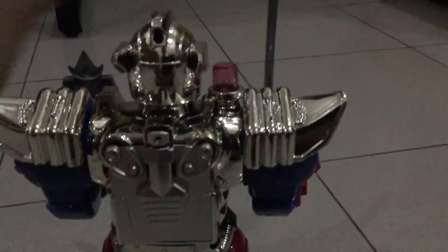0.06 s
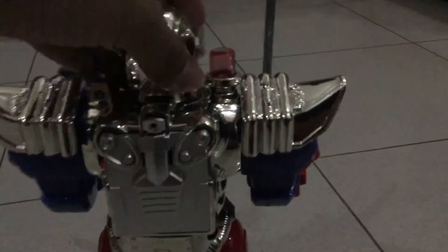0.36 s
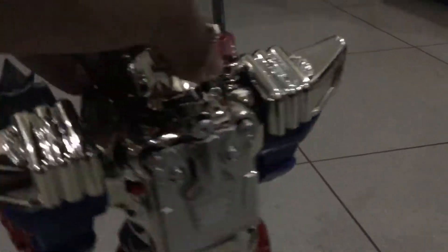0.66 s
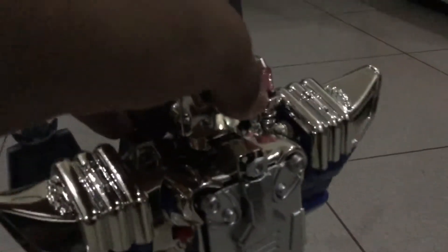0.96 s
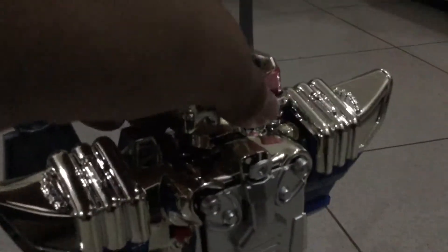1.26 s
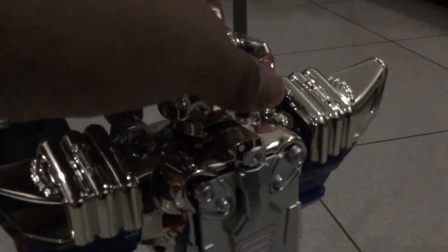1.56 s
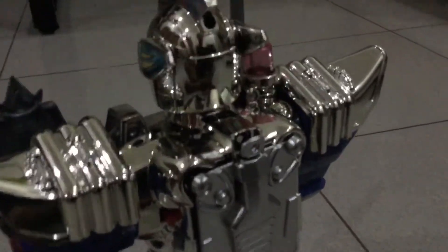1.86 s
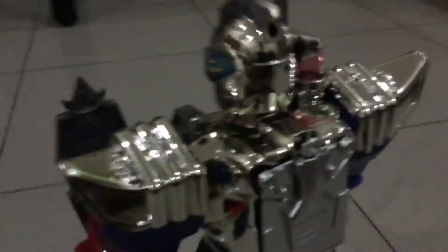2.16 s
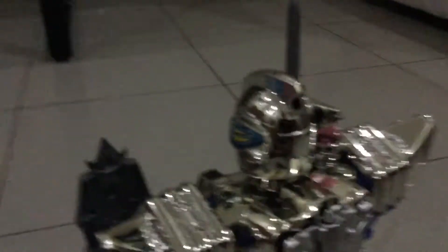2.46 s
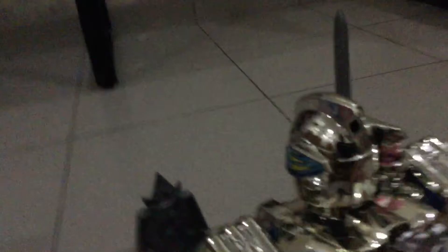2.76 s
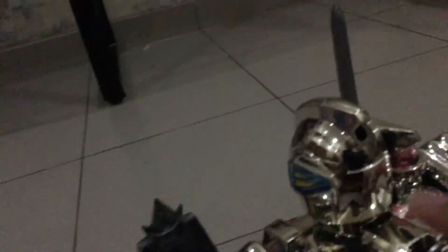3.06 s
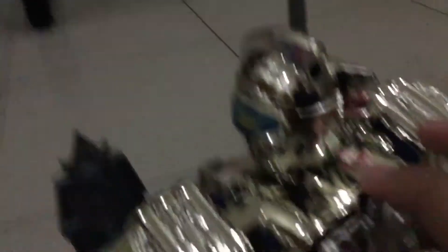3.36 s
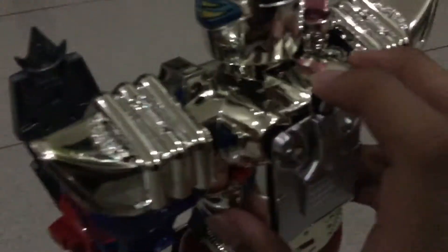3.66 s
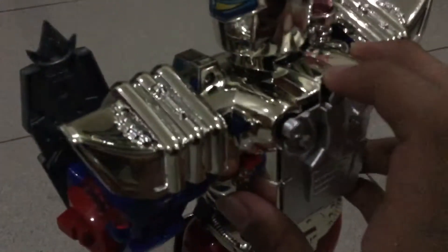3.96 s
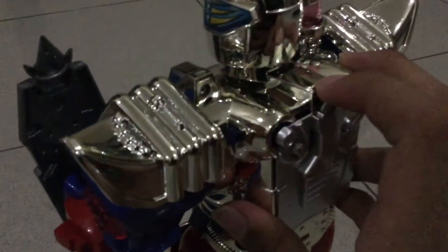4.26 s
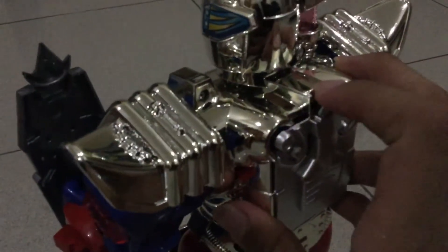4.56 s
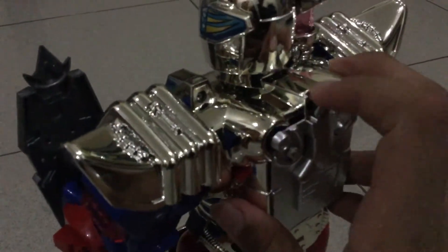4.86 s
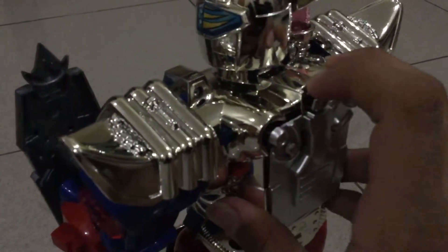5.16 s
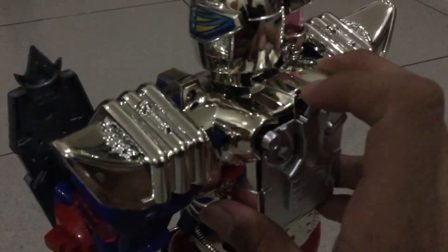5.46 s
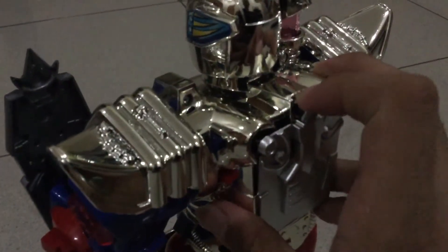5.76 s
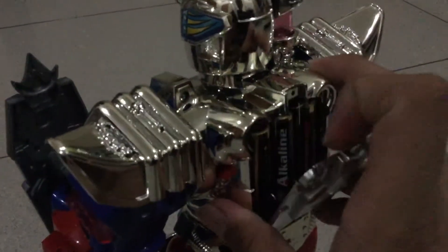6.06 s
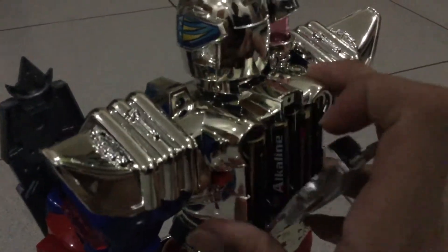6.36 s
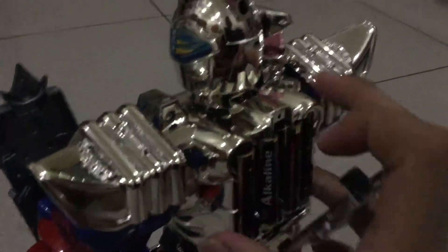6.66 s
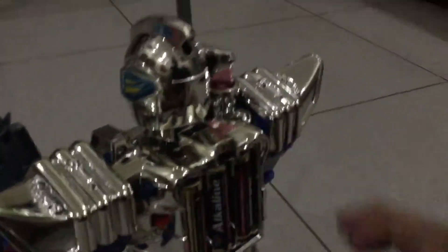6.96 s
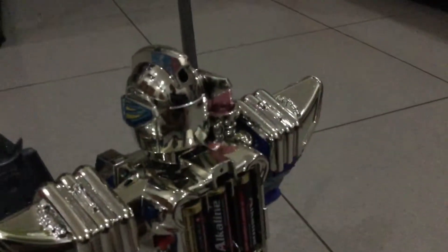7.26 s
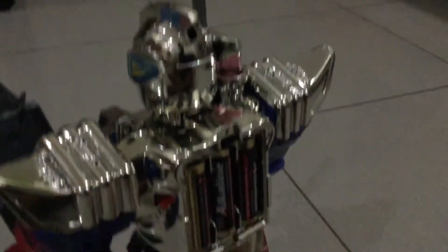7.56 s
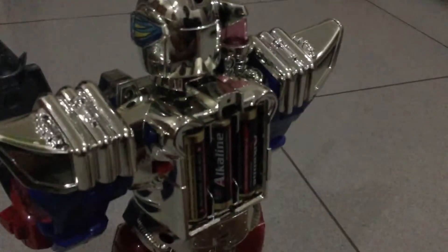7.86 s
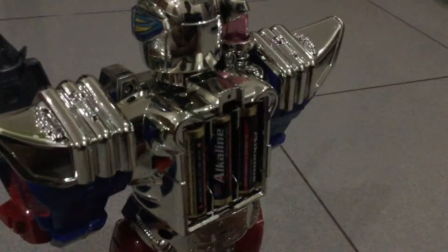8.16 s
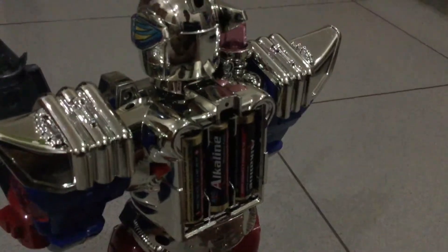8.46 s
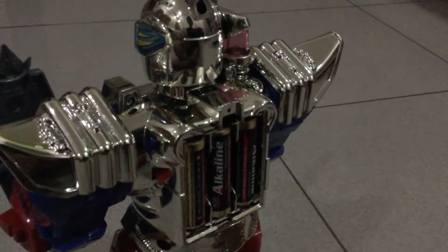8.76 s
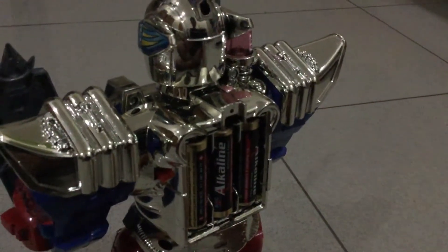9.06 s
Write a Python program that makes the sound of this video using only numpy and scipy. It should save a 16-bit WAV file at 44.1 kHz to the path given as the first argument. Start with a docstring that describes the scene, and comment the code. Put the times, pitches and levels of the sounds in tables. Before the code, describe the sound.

In a quiet tiled room, a cricket chirps faintly and steadily over a low rumble and soft hiss. Close by, a plastic toy's head clicks and grinds as it is twisted, followed by a brief rub and bumps on the microphone. A fingernail picks at the battery cover with sharp clicks until it snaps off, the loudest sound. A few soft handling taps trail away.

```python
"""A low room rumble, faint hiss and far insects come first, with a cricket chirping by rubbing its wings.
A hand turns the head of a hollow plastic toy robot, which clicks and grinds. Each click is a short run
of slips that makes the plastic ring, and a tiled room answers. Fingers shift their grip on a camera
once, with a rub and a few bumps. Then a nail pries at the toy's battery cover until it snaps off."""
import sys
import numpy as np
from scipy import signal
from scipy.fft import rfft, irfft
from scipy.io import wavfile
from scipy.ndimage import uniform_filter1d

SR = 44100
rng = np.random.default_rng(int(sys.argv[2]) if len(sys.argv) > 2 else 0)


def to_wav(s):
    """Save 16-bit WAV."""
    ch = np.atleast_2d(s).T  # columns
    pcm = np.round(np.clip(ch, -1, 1) * 32767)  # PCM
    wavfile.write(sys.argv[1], SR, pcm.astype(np.int16))


N = 410571

# tone of the room's rumble, a soft drone in it, the hiss and the far insects: f/Hz, level/dB
RUMBLE = [(20, -53.5), (30, -30), (40, -14), (62, 2), (100, -2.5), (140, -3.5), (200, -3.5), (260, -9.5),
          (350, -17.5), (500, -31), (1000, -53.5)]
DRONE = [(60, -42.5), (110, -17), (135, -5), (149, 3), (168, -6.5), (200, -8), (250, -19.5), (450, -47.5)]
HISS = [(300, 2.5), (500, -0.5), (900, -2), (1500, -3), (3000, -6.5), (5000, -5), (6500, -9), (8600, -7.5),
        (10000, -23), (12500, -16), (15000, -28.5), (16000, -31.5)]
FAR_INSECTS = [(6000, -38), (6700, -18), (6980, -4), (7150, -3.5), (7450, -3), (7650, -1), (7850, -5),
               (8050, -0.5), (8300, -16), (9000, -35.5)]
# moments when the drone grows louder: t/s, half width/s, lift/dB
DRONE_SWELLS = [(.99, .12, 11), (8.12, .09, 4.5), (8.7, 1.1, 4)]
# the cricket's runs of chirps, with a short pause between them: start/s, end/s
CHIRP_RUNS = [(.069, 2.88), (2.989, 9.3)]
# how long the tiled room echoes: f/Hz, time to fade by 60 dB/s
ROOM_DECAY = [(200, 0.27), (800, 0.49), (2000, 0.39), (5000, 0.33), (9000, 0.44), (15000, 0.41)]
# overall tone of thin plastic, and of skin rubbing the camera case: f/Hz, level/dB
PLASTIC_TONE = [(60, -41.5), (200, -22), (450, -25.5), (750, -13), (1100, -12), (2000, -6.5), (3500, -2),
                (5200, -1), (7000, -10.5), (9000, -14.5), (10000, -25), (12500, -22), (16000, -27.5)]
SKIN_TONE = [(40, -1), (200, 6.5), (450, -3), (720, 0), (1200, -1), (1800, -10), (2450, -5), (3800, -25),
             (8000, -7), (10000, -16), (13000, -11), (16000, -23)]
# modes (pitches at which a part rings) of the toy's body, catch and cover: f/Hz, width/Hz, lift/dB
BODY_MODES = [(750, 240, 12.5), (1313, 120, 12.5), (1646, 81.8, 8), (2110, 250, 3.5), (2920, 320, 2),
              (3340, 53, 5), (3974, 230, 4), (4790, 250, 3), (5300, 160, 5), (5800, 200, 4.5),
              (6370, 50, 7.5), (7090, 260, 7), (8250, 250, 8), (8600, 190, 3), (13620, 1200, 7)]
CATCH_MODES = [(352, 430, 12.4), (723, 220, 17.2), (1550, 1400, 3.7), (2060, 460, 13), (2680, 120, 3.3),
               (3400, 240, 3.4), (4575, 165, 18), (5320, 360, 10), (6340, 470, 9.6), (6800, 270, 7),
               (7950, 670, 16.5), (8900, 320, 8.4), (11760, 970, 19), (13200, 600, 15)]
COVER_MODES = [(480, 500, 17), (706, 350, 6.5), (1530, 300, 13), (2340, 350, 10), (3240, 300, 3.8),
               (3850, 400, 8), (4500, 320, 5), (5360, 400, 10), (6180, 250, 10), (7000, 350, 3.8),
               (7400, 300, 9), (8450, 1200, 9.7), (11170, 500, 13), (12900, 800, 7.5), (13320, 500, 10),
               (14400, 500, 8)]
# light touches of fingers and loose parts: t/s, level/dB, f/Hz of the struck spot
TOUCHES = [(0.3136, -56.5, 4510), (0.3427, -57.5, 4600), (0.392, -51.5, 1270), (0.705, -54, 4500),
           (.7342, -52, 3100), (1.1218, -51.5, 3450), (1.1316, -52, 3270), (1.207, -54, 1300),
           (1.6642, -58, 1250), (2.114, -51.5, 1360), (2.307, -46.5, 2100), (3.083, -50.5, 4640),
           (3.0962, -54.5, 5400), (3.117, -50, 4430), (3.355, -56.5, 1750), (3.3627, -53, 4650),
           (3.485, -50, 4530), (3.6967, -55, 780), (3.8169, -49, 1220), (4.266, -55, 905),
           (4.3635, -61, 1760), (4.7688, -56.5, 3730), (4.8745, -51, 680), (4.889, -54, 3900),
           (5.3347, -55.5, 1410), (5.446, -57.5, 5030), (6.2216, -56, 5350), (6.293, -55.5, 1640),
           (6.318, -54.5, 4370), (6.437, -54.5, 3670), (6.488, -53, 3130), (6.7134, -51.5, 5040)]
# spells of fingering that set off faint ticks: start/s, end/s, level/dB
FIDGETS = [(0.329, 0.416, -62), (0.687, 0.774, -59), (1.078, 1.218, -58), (1.417, 1.603, -63.5),
           (3.148, 3.877, -65), (4.149, 4.399, -63.5), (4.754, 4.955, -63), (6.203, 6.682, -64.5)]
# dry skin sliding over plastic: t/s, length/s, level/dB, f/Hz
SCRAPES = [(2.113, 0.055, -51, 4840), (2.425, 0.052, -58.5, 4914), (6.14, 0.044, -56.5, 5300),
           (8.132, 0.042, -69, 3900), (8.695, 0.032, -68, 4600), (9.241, 0.043, -65, 5500)]
# hard clicks of the joints and shell, a nail slipping off the catch, and the cover coming free:
# t/s, level/dB, slip time/s, f/Hz of the struck spot, treble edge/dB, hollow tone/dB
JOINT_CLICKS = [(0.4074, -40.5, 0.0042, 6240, 2, 1), (0.4203, -43, 0.0031, 3300, 8, -1),
                (0.4286, -37.5, 0.0016, 5000, 2, -5), (0.4506, -27.5, 0.001, 5070, -1, 21),
                (0.455, -26, 0.0045, 5700, 1, 10), (.5242, -35, 0.00077, 4940, -8, 7),
                (0.5257, -28, 0.0054, 5030, -2, 3), (0.6271, -42, 0.0024, 6640, 6, -7),
                (0.7194, -41, 0.0081, 4330, -3, 7.5), (0.8847, -29, 0.0011, 5130, 9, -8),
                (0.8873, -21.5, 0.0031, 3400, 1.5, -10.5), (0.903, -31.5, 0.0024, 1870, -6, -13),
                (.9203, -34.5, 0.0017, 4560, 3, 0), (0.9722, -38.5, 0.0034, 6600, -9, -1),
                (1.1853, -37.5, 0.0045, 3570, 9, -20), (1.6418, -36, .0022, 3900, -10, -7),
                (2.1714, -41, 0.0018, 8800, 17, 8), (3.5396, -36, 0.0016, 3270, 3, -4),
                (3.5673, -43, .0025, 5500, 6, 7), (3.5938, -35.5, 0.0031, 4700, 2, -2),
                (3.6176, -41, 0.0029, 4340, -11, 2), (3.6248, -36.5, .001, 3350, -5, 11),
                (3.766, -43.5, 0.0033, 4600, 5, -14), (4.92, -33, .0008, 3970, 4.5, 4),
                (4.934, -47.5, .0008, 3900, -3, 5), (6.3798, -47.5, 0.0036, 6300, -2, 1),
                (6.3882, -41.5, 0.0037, 1400, 1, -6)]
CATCH_SLIPS = [(3.978, -29, 0.0027, 4700, 8, 0), (3.982, -22.5, 0.0023, 4700, 5, -1),
               (3.9858, -34.5, 0.0031, 2110, 1.7, 0)]
COVER_SNAPS = [(5.9047, -14.6, .0033, 5400, 7, -5), (5.919, -27.5, 0.048, 5000, -2.5, -5),
               (5.9384, -32, .0064, 5000, -1, -2), (5.9687, -36, .0093, 4800, -4, -10)]
# plastic grinding on plastic: start/s, hardest/s, end/s, level/dB, hollow tone/dB
GRINDS = [(0.415, .478, 0.517, -30.5, 3), (0.871, 0.897, 1.055, -42.5, 1), (3.533, 3.585, 3.63, -43, 2),
          (6.27, 6.388, 6.7, -66.5, 6)]
# fingers sliding on the camera: start/s, hardest/s, end/s, level/dB, brightness/dB
CASE_RUBS = [(2.097, 2.14, 2.16, -41.5, 0.5), (2.215, 2.313, 2.315, -33, -12.5),
             (2.382, 2.439, 2.57, -60.5, 23)]
# bumps on the camera case: t/s, level/dB, f/Hz, decay/s
CASE_BUMPS = [(2.127, -36.5, 122, 0.0059), (2.135, -35, 74.6, 0.0069), (2.178, -32.5, 100, 0.0048),
              (2.3025, -32.5, 700, 0.0015), (2.312, -37.5, 198, 0.0064)]


def gain_of(db):
    """Turns decibels into a number to multiply by."""
    return 10 ** (np.asarray(db) / 20)


def evened(x):
    """Scales a signal to an average strength (rms) of 1."""
    return x / np.sqrt(np.mean(x ** 2) + 1e-20)


def read(table, hz):
    """Looks up values between a table's rows, on a log-frequency scale."""
    f, value = np.transpose(table)
    return np.interp(np.log(hz + 1), np.log(f + 1), value)


def add(mix, s, sound):
    """Adds a sound to the mix, starting at s seconds."""
    part = mix[max(round(s * SR), 0):][:len(sound)]
    part += sound[:len(part)]


def coloured(x, tone):
    """Gives a signal the tone in a table, at rms 1."""
    return evened(irfft(rfft(x) * gain_of(read(tone, np.fft.rfftfreq(N, 1 / SR))), N))


def background(rumble_db=-63, drone_db=-65.5, hiss_db=-68, insects_db=-68):
    """Shaped noise makes the rumble, a swelling drone, even hiss and the blur of many far insects."""
    rumble, hiss, insects, drone = rng.standard_normal((4, N))
    t = np.arange(N) / SR
    swell_db = sum(db * np.exp(-((t - s) / width_s) ** 2) for s, width_s, db in DRONE_SWELLS)
    return (gain_of(rumble_db) * coloured(rumble, RUMBLE)
            + gain_of(drone_db + swell_db) * coloured(drone, DRONE)
            + gain_of(hiss_db) * coloured(hiss, HISS)
            + gain_of(insects_db) * coloured(insects, FAR_INSECTS))


def cricket(level_db=-53, period_s=.1102, jitter_s=.002, gap_s=.017, top_hz=7900, end_hz=6800):
    """Each chirp is two wing strokes, each a whistle that falls as the wing slows."""
    beats = np.concatenate([np.arange(start, end, period_s) for start, end in CHIRP_RUNS])
    progress = np.arange(0, 1, 1 / (.014 * SR))  # through one 14 ms stroke
    out = np.zeros(N)
    for s in beats + jitter_s * rng.standard_normal(len(beats)):
        for offset_s, db in ((-gap_s, -2), (0, 0)):
            pitch, strength, *teeth = rng.standard_normal(10)
            hz = (top_hz + (end_hz - top_hz) * progress) * (1 + .005 * pitch)
            # the tiny teeth on the wing bite unevenly
            bite = evened(gain_of(4 * np.interp(progress, np.linspace(0, 1, len(teeth)), teeth)))
            stroke = bite * np.sin(np.pi * progress) * np.sin(2 * np.pi * np.cumsum(hz) / SR)
            add(out, s + offset_s, gain_of(level_db + db + .9 * strength) * stroke)
    return out + gain_of(-3) * room(out)


def room(x, echoes_per_s=5000):
    """The tiles send back many small echoes, a little dull, each pitch fading at its own speed."""
    echoes = rng.choice([-1., 1.], SR) * (rng.random(SR) < echoes_per_s / SR)
    echoes *= np.clip((np.arange(SR) / SR - .004) / .007, 0, 1)  # they begin after 4 ms
    hz, t, bands = signal.stft(echoes, SR, nperseg=256)
    dull_db = -2 * np.clip(hz / 9000, 0, 1)[:, None] ** 4
    fade_db = -60 * t / read(ROOM_DECAY, hz)[:, None]
    tail = signal.istft(bands * gain_of(dull_db + fade_db), SR, nperseg=256)[1]
    return signal.fftconvolve(x, tail / np.linalg.norm(tail) * gain_of(-1))[:N]


def slips(slip_s, size):
    """A run of tiny slips builds up; the longer it lasts, the longer the chatter after it."""
    t = np.arange(size) / SR
    contacts = rng.standard_normal(size) * np.where(rng.random(size) < .3, 2, 1)
    rise = 1 - np.exp(-t / (.0005 + .12 * min(slip_s, .01)))
    chatter = np.exp(-np.maximum(t - slip_s, 0) / (.0026 + .3 * slip_s))
    return contacts * rise * np.where(t < slip_s, 1, gain_of(-6) * chatter)


def peak(hz, centre_hz, width_hz):
    """The hill shape of one mode, 1 at its top."""
    return 1 / (1 + (2 * (hz - centre_hz) / width_hz) ** 2)


def at_spot(modes, scatter_db):
    """Each spot on a part favours the modes in its own way."""
    return [(hz, width, lift + scatter_db * rng.standard_normal()) for hz, width, lift in modes]


def click(modes, slip_s, knock_db, edge_db, hollow_db, spot_hz, spot_db, focus=1, size=4096):
    """Slips make a plastic part ring; a focus under 1 blurs its modes."""
    hz = np.fft.rfftfreq(size, 1 / SR)
    force = rfft(slips(slip_s, size))
    lifts = sum(lift * peak(hz, f, width) for f, width, lift in modes)
    # the struck spot answers most near its own pitch, less far from it
    lifts += spot_db * peak(hz, spot_hz, .15 * spot_hz)
    lifts -= spot_db * .21 * np.minimum(abs(np.log2((hz + 1) / spot_hz)), 2)
    db = read(PLASTIC_TONE, hz) + focus * lifts + (1 - focus) * uniform_filter1d(lifts, size=140)
    db += knock_db / (1 + (hz / 2300) ** 4)  # low knock of a soft contact
    db += edge_db / (1 + (7500 / (hz + 1)) ** 6)  # treble edge of a hard one
    db += hollow_db * peak(hz, 830, 430)  # the air inside the toy
    db -= 10 * np.log10(uniform_filter1d(abs(force) ** 2, size=70))  # slips feed all bands alike
    log_gain = np.r_[db, db[-2:0:-1]] * np.log(10) / 20
    ring = np.exp(np.conj(signal.hilbert(log_gain)))[:len(hz)]  # rings only after the blow
    sound = irfft(force * ring) * np.linspace(1, 0, size)
    return sound / np.linalg.norm(sound) * np.sqrt(.01 * SR)  # the energy of 10 ms at rms 1


def struck(blows, modes, spot_db, room_db, scatter_db=0):
    """Each blow makes one part click, and the room echoes it."""
    direct, to_room = np.zeros((2, N))
    for s, db, slip_s, spot_hz, edge_db, hollow_db, knock_db in blows:
        contact = (at_spot(modes, scatter_db), slip_s, knock_db, edge_db, hollow_db, spot_hz, spot_db)
        add(direct, s, gain_of(db) * click(*contact))
        # the room gathers sound from all directions, so single modes stand out less
        add(to_room, s, gain_of(db + room_db) * click(*contact, focus=.4))
    return direct + room(to_room)


def touches(slip_s=.0054, knock_db=6, hollow_db=-4, plain_hz=3540, edge_db_per_octave=10):
    """Soft taps on the body: stiff, high-pitched spots sound sharper than soft, low ones."""
    blows = [(s, db, slip_s, hz, edge_db_per_octave * np.log2(hz / plain_hz), hollow_db, knock_db)
             for s, db, hz in TOUCHES]
    return struck(blows, BODY_MODES, spot_db=8.5, room_db=-11, scatter_db=1.5)


def fingers(ticks_per_s=22, room_db=-8):
    """Fingers set off faint ticks at random spots, and dry skin scrapes the plastic."""
    out = np.zeros(N)
    for start, end, db in FIDGETS:
        for when, spot, strength in rng.random((round((end - start) * ticks_per_s), 3)):
            tick = click(at_spot(BODY_MODES, 3), slip_s=.003, knock_db=8, edge_db=-5, hollow_db=0,
                         spot_hz=1000 * 6 ** spot, spot_db=8)
            add(out, start + when * (end - start), gain_of(db + 3 * strength) * tick)
    for s, length_s, db, hz in SCRAPES:
        grains = rng.standard_normal(round(length_s * SR)) ** 3
        wall = signal.iirpeak(hz, 2.5, fs=SR)
        scrape = signal.lfilter(*wall, signal.lfilter(*wall, grains))
        add(out, s, gain_of(db) * evened(scrape) * np.hanning(len(scrape)))
    return out + gain_of(room_db) * room(out)


def joints(crisp_db=-38, knock_per_db=.45):
    """The toy's joints and shell click: hard clicks are crisp, gentle ones have more low knock."""
    blows = [(s, db, *contact, knock_per_db * (crisp_db - db)) for s, db, *contact in JOINT_CLICKS]
    return struck(blows, BODY_MODES, spot_db=8, room_db=-16, scatter_db=2.5)


def push(start, hardest, end, depth_db, shape=1):
    """A push grows to its hardest moment, then eases off; a shape under 1 sharpens the top."""
    slack = np.interp(np.arange(N) / SR, [start, hardest, end], [1, 0, 1])
    return gain_of(-depth_db * slack ** shape) * (slack < 1)


def friction(grain_db):
    """Rubbing makes grainy noise: many small slips and a few big ones."""
    return rng.standard_normal(N) * gain_of(grain_db * np.minimum(rng.exponential(1, N), 5))


def grinding(clump_db=4, clumps_per_s=280, room_db=-13):
    """As a part is pushed round, it sticks and slips in clumps that keep the body ringing."""
    out = np.zeros(N)
    for start, hardest, end, db, hollow_db in GRINDS:
        sticking = np.interp(np.arange(N) / SR * clumps_per_s, np.arange(N), 2 * rng.random(N) - 1)
        grains = evened(friction(grain_db=4) * gain_of(clump_db * sticking))
        force = grains * push(start, hardest, end, depth_db=13)
        body = click(BODY_MODES, slip_s=.0004, knock_db=5, edge_db=-.5, hollow_db=hollow_db,
                     spot_hz=5100, spot_db=4.5, focus=.8)
        out += gain_of(db) * signal.oaconvolve(force, body / np.linalg.norm(body))[:N]
    return out + gain_of(room_db) * room(out)


def camera_grip(split_hz=2500):
    """Skin drags over the camera case in fine grains and bumps it."""
    grains = coloured(friction(grain_db=5.5), SKIN_TONE)
    low = signal.sosfilt(signal.butter(1, split_hz, fs=SR, output="sos"), grains)
    out = np.zeros(N)
    for start, hardest, end, db, bright_db in CASE_RUBS:
        rub = evened(low + gain_of(bright_db) * (grains - low))
        out += gain_of(db) * push(start, hardest, end, depth_db=26, shape=.72) * rub
    t = np.arange(SR // 10) / SR
    for s, db, hz, decay_s in CASE_BUMPS:
        rise_and_fall = t / decay_s * np.exp(1 - t / decay_s)
        add(out, s, gain_of(db) * rise_and_fall * np.sin(2 * np.pi * hz * t))
    return out


def battery_cover(catch_knock_db=0, cover_knock_db=-.7):
    """A nail slips off the catch; later the cover snaps free, slides out of its slot and rattles."""
    nail_slips = [(*row, catch_knock_db) for row in CATCH_SLIPS]
    snaps = [(*row, cover_knock_db) for row in COVER_SNAPS]
    catch = struck(nail_slips, CATCH_MODES, spot_db=1.7, room_db=-16.5)
    cover = struck(snaps, COVER_MODES, spot_db=1.54, room_db=-13.5)
    return catch + cover


def scene():
    """The toy, the hands and the night around them, in one channel."""
    toy = joints() + battery_cover() + grinding() + touches()
    return (toy + camera_grip() + background() + cricket() + fingers())[None]


def record(dry, low_cut_hz=42, ceiling=.8, high_cut_hz=15950):
    """The microphone cuts deep bass and rounds the loudest peaks; the highest treble is cut too."""
    thinned = signal.sosfilt(signal.butter(2, low_cut_hz, "high", fs=SR, output="sos"), dry)
    rounded = thinned / (1 + (thinned / ceiling) ** 6) ** (1 / 6)
    treble_cut = signal.firwin(401, high_cut_hz, window=("kaiser", 8), fs=SR)
    return signal.oaconvolve(rounded, treble_cut[None], "same")


dry = scene()
out = record(dry)
to_wav(out)
```